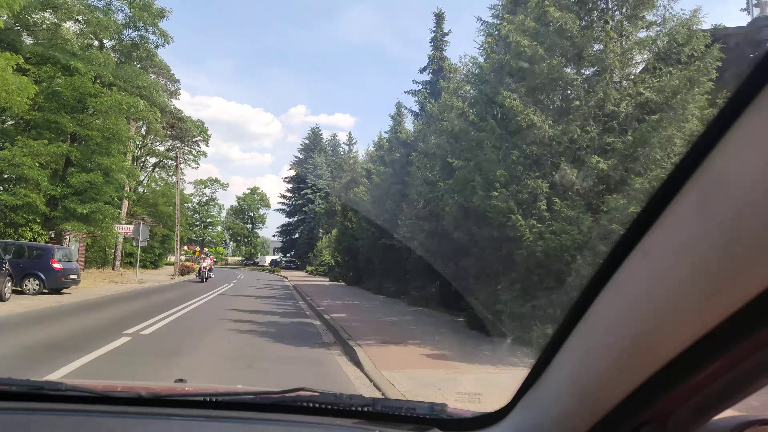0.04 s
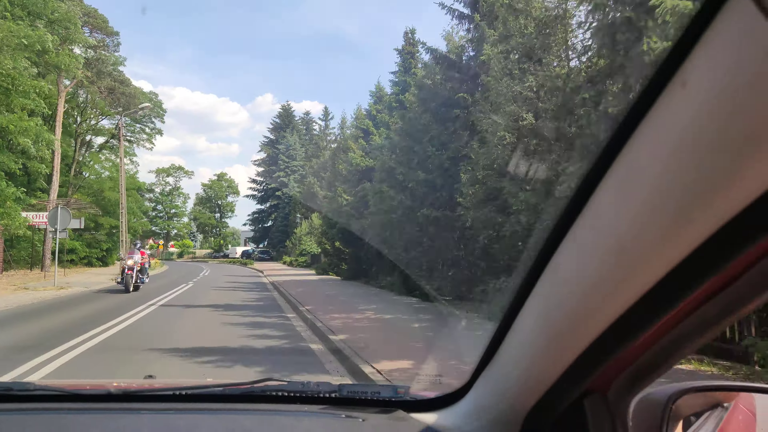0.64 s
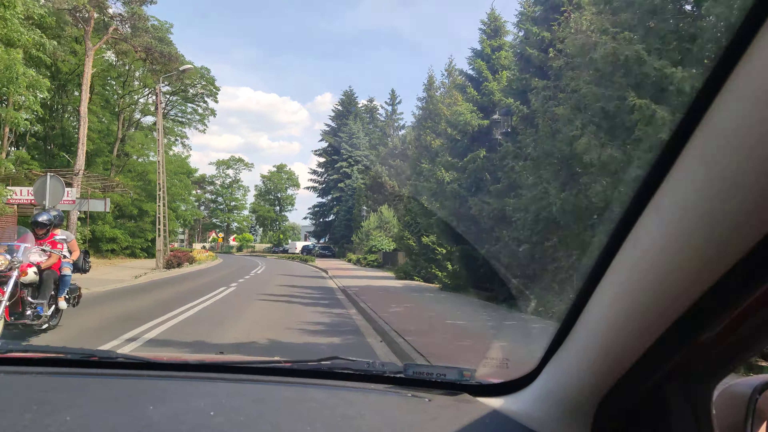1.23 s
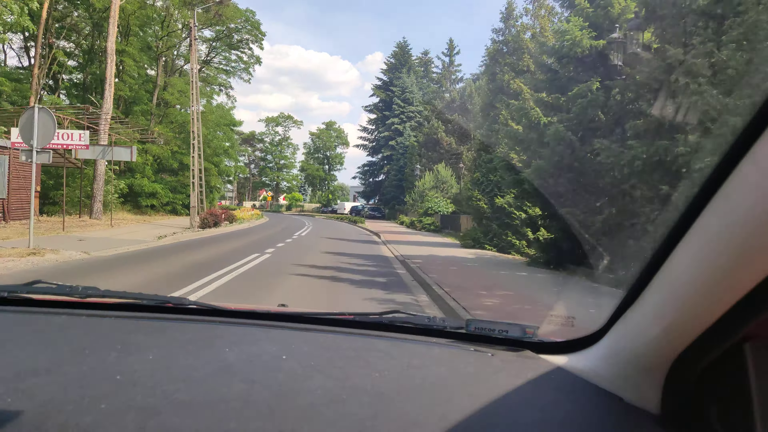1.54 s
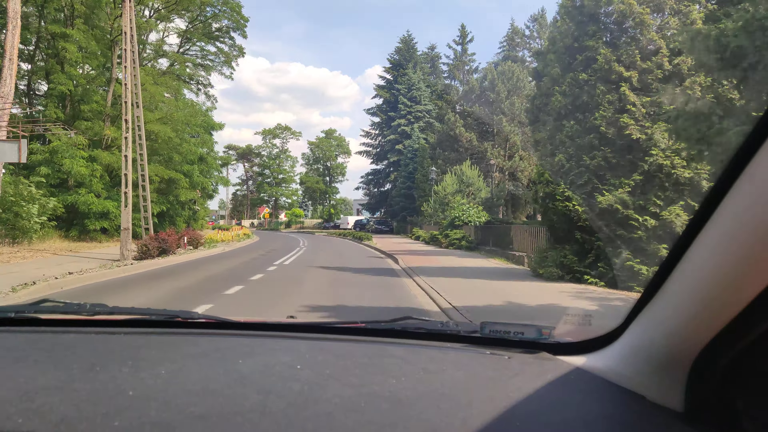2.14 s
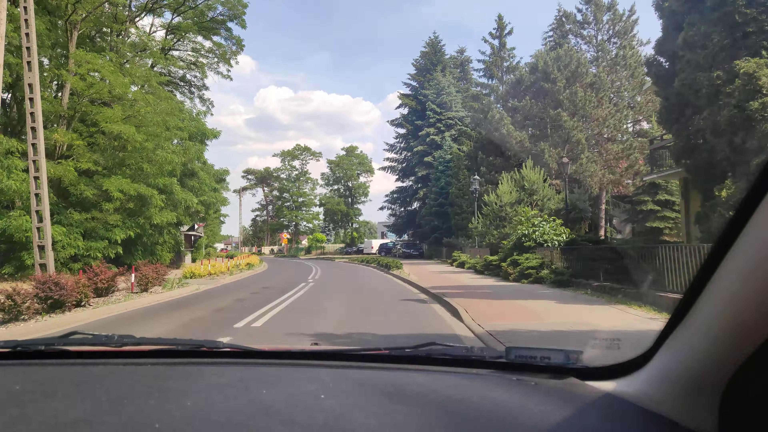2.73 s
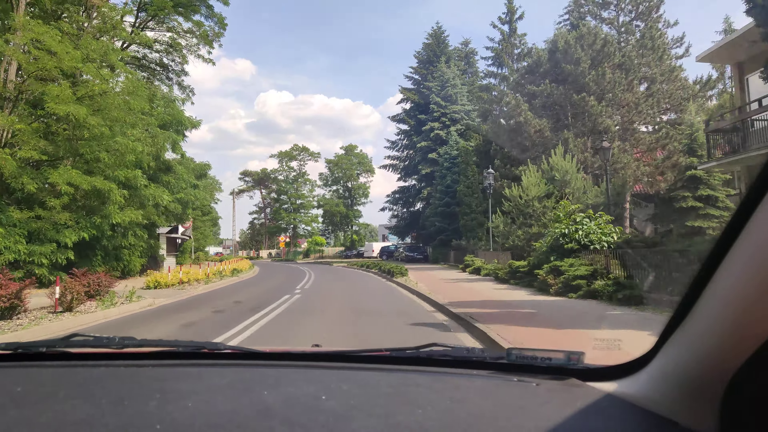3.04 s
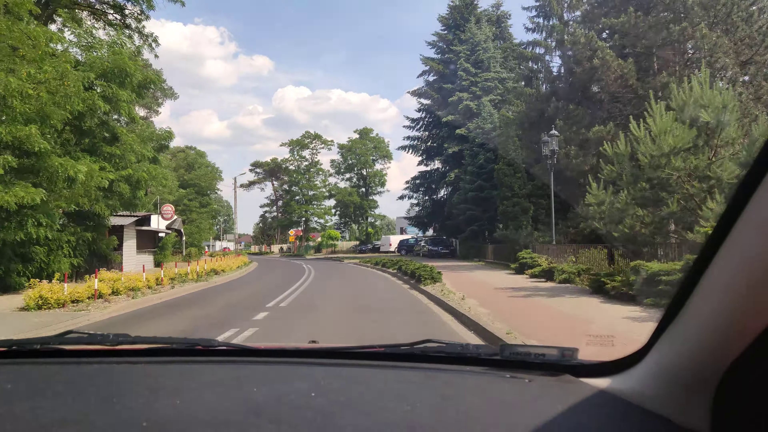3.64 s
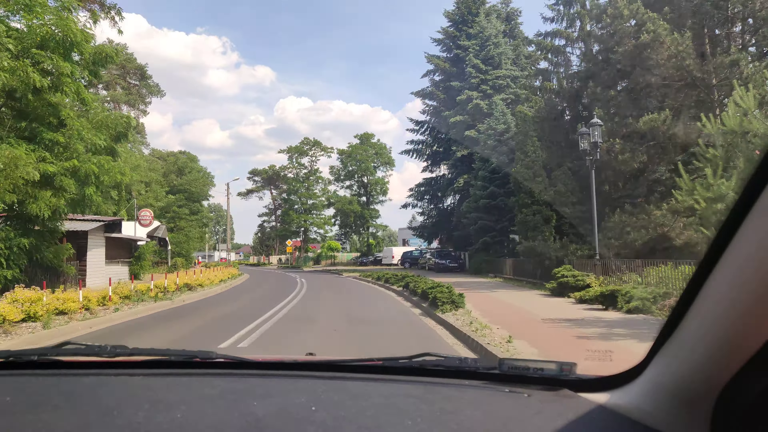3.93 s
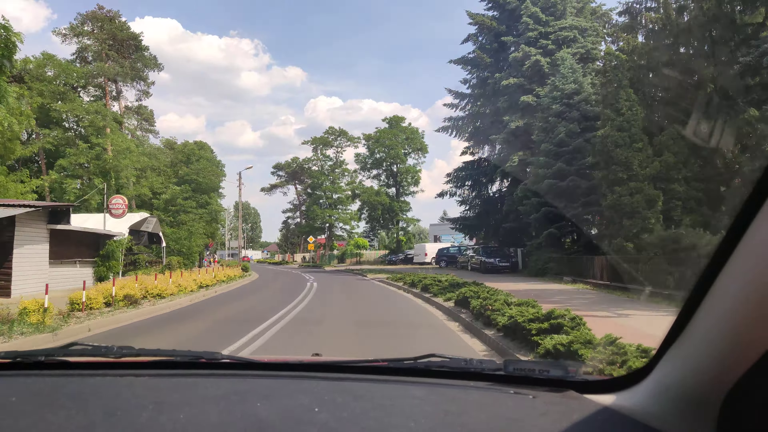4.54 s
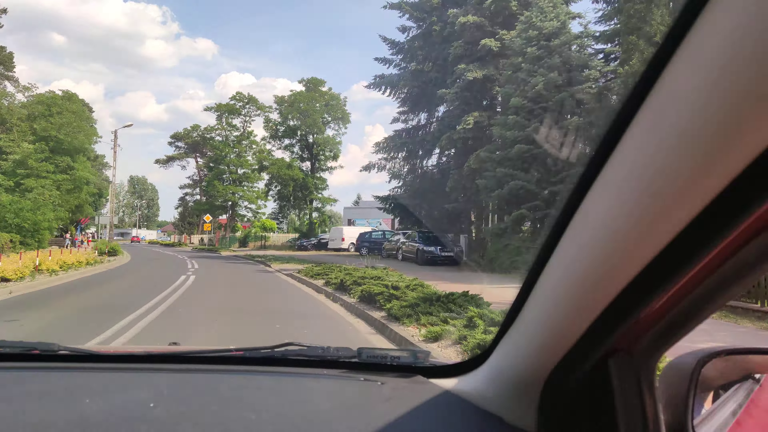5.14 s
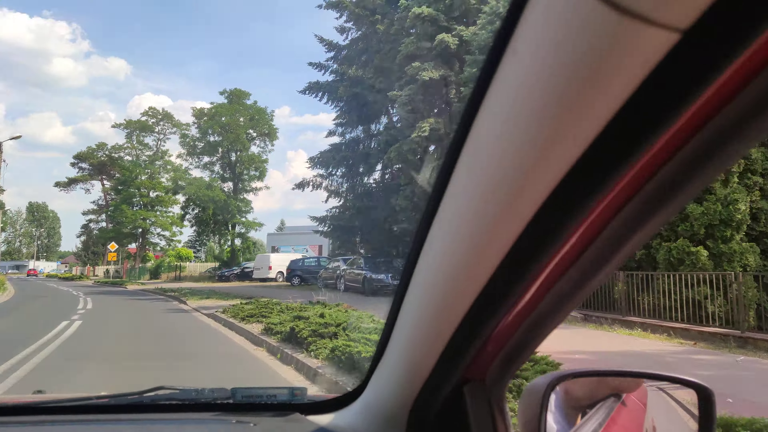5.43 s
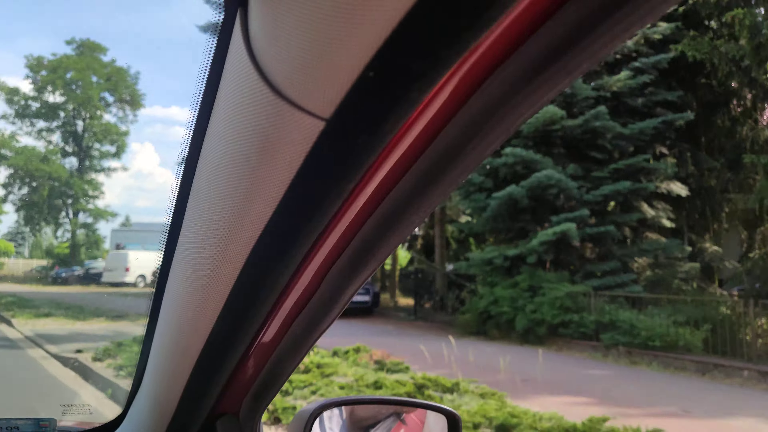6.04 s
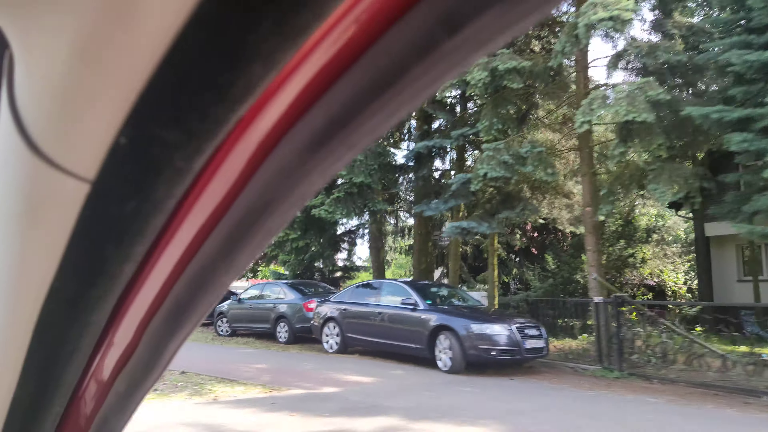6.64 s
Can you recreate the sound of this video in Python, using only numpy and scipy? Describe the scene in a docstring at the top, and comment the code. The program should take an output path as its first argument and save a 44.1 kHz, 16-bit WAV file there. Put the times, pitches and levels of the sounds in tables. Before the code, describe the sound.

Tyres and engine rumble steadily inside a moving car while air brushes an open window. An oncoming motorcycle swells up with an uneven, throbbing exhaust, passes close and falls away at a lower pitch. The cabin drone continues, with one faint squeak. Finally the rush of air returns, and wind strikes the left side of the microphone in loud, crackling thumps.

```python
"""A twin-cylinder motorcycle thuds by the other way, dropping in pitch, heard from inside a small car.
Its uneven firings ring the exhaust pipes and its running gear sizzles through the open side window.
Tyres and engine drone in the cabin, the body shakes on the village road and air rushes past,
with a few faint squeaks and ticks. Near the end the microphone turns to the window
and gusts overload its left port."""
import sys
import numpy as np
from scipy import signal
from scipy.fft import rfft, irfft, next_fast_len
from scipy.io import wavfile
from scipy.ndimage import uniform_filter1d, minimum_filter1d, map_coordinates

SR = 44100
rng = np.random.default_rng(int(sys.argv[2]) if len(sys.argv) > 2 else 0)


def store_wav(level_fs):
    """Save 16-bit WAV to argv[1]."""
    pcm = np.round(np.clip(np.atleast_2d(level_fs), -1, 1) * 32767)
    wavfile.write(sys.argv[1], SR, pcm.T.astype(np.int16))


N = 304290
TIME = np.arange(N) / SR
PASS_S, ABREAST_S = 1.722, 0.1738  # the motorcycle is closest; time it takes to cover the lane gap
GUST_EDGE = 3.3  # how squarely a gust sets in and stops

# gusts on the left port: (time [s], force [dB], half length [s], hollow tone [Hz], tone level [dB])
GUST_HITS = [(5.944, -20, .004, 130, -13), (5.961, -9.5, 0.0085, 297, -11), (5.98, -34, .01, 302, -27),
             (6.028, -7.5, 0.0043, 170, -7), (6.048, -24, 0.0049, 367, -14.5),
             (6.072, -24, 0.0035, 500, -21), (6.297, -5.5, 0.0053, 816, -12.5),
             (6.311, -12.5, 0.0092, 424, -17), (6.333, -26, 0.0086, 503, -27), (6.418, -11, .011, 447, -17),
             (6.432, -0.5, 0.0053, 870, -15), (6.447, -11.5, .007, 640, -17),
             (6.488, -17, 0.0047, 500, -21), (6.5, -5, 0.0048, 743, -14), (6.513, -2.5, .007, 487, -11.5),
             (6.529, -3.5, 0.0063, 302, -12), (6.545, -13, .009, 586, -16.5),
             (6.575, -10, 0.0078, 400, -24), (6.589, 3, 0.0042, 970, -21), (6.602, 1, .005, 310, -6.5),
             (6.613, -10, .008, 450, -22), (6.634, -17, 0.0051, 400, -16), (6.65, 0, 0.0077, 824, -8.5),
             (6.677, -11, 0.012, 900, -24), (6.7, -17, 0.012, 320, -26), (6.717, -12.5, .006, 420, -20),
             (6.73, -1.5, 0.0038, 564, -10.5), (6.745, -10, 0.0073, 824, -27), (6.766, -17, .003, 297, -14),
             (6.797, -23, 0.0049, 250, -18), (6.817, -12.5, .003, 342, -9), (6.835, -20, .003, 600, -21),
             (6.859, -12, 0.004, 466, -16), (6.875, -12, .003, 150, -6), (6.886, 1, .004, 690, -4),
             (6.896, -6, 0.0039, 300, -8)]
# bright colour of the running gear and the trim ticks: (frequency [Hz], level [dB])
SIZZLE = [(600, -7.5), (1500, 9), (2300, -0.5), (3400, 0.5), (4350, 6.5), (5400, -4), (6600, 2.5),
          (7900, -7.5), (14000, -8)]


def motorcycle(mach=0.06, cycle_hz=20.45, firing_s=1.795):
    """The engine's clock seems fast as it nears and slow as it leaves; one firing lands at firing_s."""
    extra_path_s = np.hypot(TIME - PASS_S, ABREAST_S) - np.hypot(PASS_S, ABREAST_S)
    clock = TIME - mach * extra_path_s
    doppler = lambda x: np.interp(clock, TIME, x)
    cycle = cycle_hz * (TIME - np.interp(firing_s, TIME, clock))
    return exhaust(cycle, doppler) + exhaust_drone(doppler(cycle)) + running_gear()


def exhaust(cycle, doppler, second_at=0.44, second_gain=0.56, puff_cycles=0.31, rasp=0.4):
    """Two uneven firings a cycle ring the pipes, each followed by a puff of turbulent gas."""
    # open pipe, sharp bark, churning gas and muffled thud: (frequency [Hz], level [dB])
    pipe_eq = [(40, -16), (110, -24.5), (190, 6.5), (275, 10), (365, -1.5), (440, 2), (570, -10),
               (700, -18.5), (900, -27), (1200, -47), (2000, -62), (4000, -84), (9000, -115)]
    bark_eq = [(200, -26), (500, -6.5), (720, -2), (900, -8.5), (1100, -21), (1600, -36), (5000, -73)]
    roar_eq = [(70, -30), (140, -0.5), (220, 3.5), (300, -5.5), (380, -11), (700, -42), (2000, -80)]
    thud_eq = [(30, -31), (70, -10.5), (130, 2), (200, 5.5), (245, 4), (310, -16), (600, -41), (1500, -76),
               (5000, -110)]
    # pipe and bark resonances: (frequency [Hz], width [Hz], lift [dB])
    pipe_modes = [(505.6, 43, 10.5)]
    bark_modes = [(686, 65, 7.5), (820, 41, 7)]
    fire = lambda offset: np.diff(np.floor(cycle - offset), prepend=np.floor(cycle[0] - offset))
    pulses = (fire(0) + second_gain * fire(second_at)) * amp(0.9 * wobble(40.5))
    puff = lambda offset: np.exp(-((cycle - offset) % 1) / puff_cycles)
    puffs = puff(0) + second_gain * puff(second_at)
    gas = lambda *tone: unit(ring(puffs * rng.standard_normal(N), *tone))
    firings = lambda *tone: doppler(unit(unit(ring(pulses, *tone)) + rasp * gas(*tone)))
    pipe = spread(firings(pipe_eq, pipe_modes), doppler(gas(pipe_eq, pipe_modes)))
    pipe *= amp(passing(-24.5, fade_db=22.5, rear_db=8, window_db=6, lead_s=0.013))
    # the bark beams backwards: the pipe mouths point at the window just after the pass
    bark = spread(firings(bark_eq, bark_modes), firings(bark_eq, bark_modes))
    bark *= amp(passing(-36, fade_db=26, rear_db=5, window_db=5, lead_s=-0.085))
    roar = spread(doppler(gas(roar_eq)), doppler(gas(roar_eq)))
    roar *= amp(passing(-24.5, fade_db=29, rear_db=-1.5, window_db=5.5))
    thud = firings(thud_eq) * amp(passing(-18.5, fade_db=21.5, rear_db=1.8, window_db=0.5))
    return pipe + bark + roar + thud


def exhaust_drone(cycle, orders=(5, 6, 9, 10, 11, 13)):
    """Harmonics of the motorcycle's engine cycle swell and fade in the cabin."""
    # thrum of the lowest order: (time [s], level [dB])
    thrum = [(0, -48), (1.2, -30), (1.52, -23.5), (1.65, -37), (1.86, -17), (2.12, -16.5), (2.36, -29.5),
             (2.86, -22.5), (3.0, -33), (3.3, -26.5), (3.8, -34), (6.9, -66)]
    # higher orders: (level [dB], loss per tenfold distance [dB], rear lift [dB], window lift [dB])
    upper_orders = [(-32, 9.7, -3.5, -1), (-30, 18.2, -6.5, 1.3), (-31, 14.6, 2.5, 0),
                    (-37, 14.4, -3.5, 1.3), (-37, 11.2, 5, 0)]
    levels_db = [*curves(thrum), *(passing(*row) for row in upper_orders)]
    tone = lambda k: np.sqrt(2) * np.sin(2 * np.pi * k * cycle + 0.25 * wobble(37))
    return sum(amp(db + 1.66 * wobble(19)) * tone(k) for k, db in zip(orders, levels_db))


def running_gear():
    """The front of the motorcycle hisses, so this layer passes a little early."""
    # resonances of the gear: (frequency [Hz], width [Hz], lift [dB])
    gear_modes = [(4000, 130, 4.5), (4620, 210, 3), (6500, 300, 2.5)]
    level_db = passing(-43, fade_db=18, rear_db=1.5, window_db=12, lead_s=0.0039)
    return amp(level_db + 1.1 * wobble(60.64)) * rush(SIZZLE, gear_modes)


def passing(level_db, fade_db, rear_db, window_db, lead_s=0):
    """Pass-by level in dB: fade_db lost per tenfold distance, lifts from behind and at the window."""
    window_half_s, frame_sharpness = 0.093, 4.4
    t = TIME - PASS_S + lead_s
    distance = np.hypot(t / ABREAST_S, 1)
    behind = t / ABREAST_S / distance
    in_window = np.exp(-np.abs(t / window_half_s) ** frame_sharpness)
    bend_db = 0.97 * t ** 2  # bends screen it off when far away
    return level_db - fade_db * np.log10(distance) + rear_db * behind + window_db * in_window - bend_db


def gust_force(wake_db=-27, wake_half_s=0.012, wake_lag_s=0.0055):
    """Each gust is a sharp-edged core inside a wider, weaker wake."""
    cores = swells([(s, db, half) for s, db, half, *_ in GUST_HITS], GUST_EDGE)
    wakes = swells([(s + wake_lag_s, db + wake_db, wake_half_s) for s, db, *_ in GUST_HITS])
    return np.hypot(cores, wakes)


def wind(force):
    """Eddies strike the left port; the stronger the gust, the finer its turbulence."""
    # slow airflow over the port: (time [s], level [dB])
    breeze = [(5.8, -23), (5.95, -14), (6.08, -22.5), (6.2, -18.5), (6.36, -26), (6.5, -21), (6.9, -19.5)]
    # thump of a gust: (frequency [Hz], level [dB])
    buffet_eq = [(20, 1), (70, 0.5), (150, 2), (250, -4.5), (380, -8.5), (650, -13), (1100, -23.5),
                 (2000, -43.5), (4000, -64), (9000, -68)]
    rumble = noise([(15, -28), (60, 0), (130, -7), (300, -25.5), (700, -42.5), (2000, -50), (5000, -94)])
    rumble *= amp(curves(breeze)[0])
    fine = noise([(150, -27), (650, 1.5), (1100, 0.5), (2000, -16), (4000, -28.5), (9000, -66)])
    crackle = amp(-11) * force ** 2 * even(fine, span_s=0.0035)
    thumps = amp(-1.3) * force ** 0.8 * even(noise(buffet_eq), span_s=0.0107)
    return np.array([rumble + thumps + flutter() + crackle, np.zeros(N)])


def flutter(waver=0.12):
    """Each gust sheds eddies at its own rate for a few cycles: a hollow knock."""
    unsteady_s = np.cumsum(1 + waver * wobble(400)) / SR
    knocks = np.zeros(N)
    for s, _, half, hz, db in GUST_HITS:
        phase = 2 * np.pi * hz * (unsteady_s - np.interp(s, TIME, unsteady_s))
        knocks += swells([(s, db, half)], GUST_EDGE) * np.sin(phase + rng.uniform(0, 2 * np.pi))
    return knocks


def choke(force, threshold_db=-33.5, depth_db=-10.5, hold_s=0.074, ramp_s=0.024):
    """Channel gains: the left port lets less through during a gust and just after it."""
    gain = np.maximum(1 / np.hypot(1, force / amp(threshold_db)), amp(depth_db))
    half = int(hold_s * SR / 2)
    held = minimum_filter1d(gain, 2 * half + 1, origin=half)
    return np.array([uniform_filter1d(held, int(ramp_s * SR) + 1), np.ones(N)])


def car(crank_hz=26.95):
    """The body shakes, the cabin air booms, and a four-cylinder engine fires twice a turn."""
    # body shake from road roughness and from single bumps: (time [s], level [dB])
    ride = [(0, -24), (1.2, -17.5), (1.7, -18.5), (3.4, -24.5), (6.4, -23.5), (6.9, -21)]
    bumps = [(.04, -13.5), (.41, -14.5), (.84, -15.5), (1.21, -16.5), (1.95, -20.5), (3.0, -19),
             (3.78, -21), (5.48, -22)]
    # body shake and cabin boom: (frequency [Hz], level [dB])
    shake_eq = [(8, -13), (18, 3.5), (28, 4.5), (40, -6), (58, -6), (75, -18.5), (120, -35), (250, -103)]
    boom_eq = [(55, -44), (80, -9), (97, -9), (112, -6), (131, 3), (155, -3), (180, -15.5), (230, -20),
               (400, -66)]
    # air modes of the cabin: (frequency [Hz], width [Hz], lift [dB])
    boom_modes = [(129.8, 4.9, 6), (145.7, 11, 3.5)]
    # balance as the microphone turns to the window: (time [s], left minus right [dB])
    balance = [(0, -2.5), (2.2, -.4), (4.3, -3.5), (5.3, -5), (5.8, -2), (6.9, 2.5)]
    crank = 2 * np.pi * np.cumsum(crank_hz * (1 + 0.0025 * wobble(2.24))) / SR
    engine = amp(-31) * np.sin(crank) + amp(-30) * np.sin(2 * crank)
    ride_db, = curves(ride)
    shake = np.hypot(amp(ride_db), swells([(s, db, 0.1) for s, db in bumps]))
    body = shake * spread(even(noise(shake_eq), span_s=0.092), noise(shake_eq))
    boom_db = -25 + 0.72 * (ride_db - ride_db.mean())  # a rougher road booms more
    cabin = amp(boom_db) * spread(even(noise(boom_eq, boom_modes), span_s=0.17), noise(boom_eq))
    return (engine + body + cabin) * pan(curves(balance)[0])


def tyres():
    """Tyres roar through the cabin and their hiss is thrown back from the roadside."""
    # tyre noise along the road: (time [s], roar [dB], hiss [dB])
    levels = [(0, -32.5, -69), (.7, -31.5, -50), (1.65, -29.5, -41.5), (2.9, -33, -51), (5.3, -33, -47.5),
              (6.3, -30.5, -48), (6.9, -30.5, -44.5)]
    # roar inside and hiss outside: (frequency [Hz], level [dB])
    roar_eq = [(120, -16.5), (200, -3.5), (310, 1), (375, -4), (470, -6), (630, -8), (950, -9.5),
               (1400, -14.5), (1800, -14.5), (2400, -19), (3300, -24), (5000, -33.5), (9000, -50)]
    hiss_eq = [(1200, 5.5), (2500, 5), (4300, 1.5), (5300, -1.5), (6500, -4.5), (8000, -11.5),
               (10000, -13.5), (14000, -14)]
    # cabin resonances: (frequency [Hz], width [Hz], lift [dB])
    cabin_modes = [(459.6, 23, 4.5), (608, 103, 6.5), (738, 35, 5.5), (1083, 40, 4), (1282, 40, 5.5),
                   (1400, 85, 8), (1880, 62, 3), (2210, 180, 2)]
    roar_db, hiss_db = curves(levels)
    roar = amp(roar_db + 0.6 * wobble(14)) * rush(roar_eq, cabin_modes)
    hiss = amp(hiss_db + 0.67 * wobble(24)) * rush(hiss_eq)
    return (roar + hiss) * pan(left_db=1.2)


def window_draught():
    """Air tears at the window edge on the left and rings the gap."""
    # tearing air: (frequency [Hz], level [dB])
    edge_eq = [(300, 6), (700, -7), (1300, 1), (2200, 2), (3000, -4.5), (4200, -13), (6000, -38),
               (7600, -41), (9500, -30), (12000, -40)]
    # gap resonances: (frequency [Hz], width [Hz], lift [dB])
    gap_modes = [(1770, 330, 1.5), (2320, 330, 1)]
    # swells of air: (time [s], level [dB], half length [s])
    draughts = [(.05, -32.5, 0.65), (.95, -33, 0.34), (2.2, -44.5, 0.33), (5.72, -35.5, 0.25),
                (5.89, -33, 0.053), (6.23, -31, 0.12), (6.6, -31, 0.22)]
    air = np.array([noise(edge_eq, gap_modes), amp(-31) * noise(edge_eq)])
    return air * swells(draughts) * amp(0.22 * wobble(22))


def squeak():
    """One faint chirp with a jittery pitch."""
    # its contour: (time [s], pitch [Hz], level [dB])
    contour = [(3.005, 4780, -85), (3.018, 4760, -53), (3.04, 4660, -55), (3.07, 4660, -53),
               (3.097, 4700, -48), (3.115, 4750, -55), (3.14, 4810, -54), (3.2, 4830, -66),
               (3.22, 4830, -90)]
    pitch_hz, level_db = curves(contour)
    sounding = (TIME > contour[0][0]) & (TIME < contour[-1][0])
    envelope = sounding * amp(level_db + 1.2 * wobble(130))
    return envelope * np.sin(2 * np.pi * np.cumsum(pitch_hz * (1 + 0.008 * wobble(300))) / SR)


def thin_whistle(centre_hz=11850, half_width_hz=200):
    """A narrow band of noise whistles very high, with a fine hiss around it."""
    # swells of the whistle and of its hiss: (time [s], level [dB], half length [s])
    whistle_swells = [(4.57, -63, .08), (5.0, -69, .11), (5.19, -59, 0.05), (5.4, -61, 0.08),
                      (5.65, -67, .06), (6.15, -69, .2)]
    sheen_swells = [(5.6, -62.5, .28), (6.23, -67, .08)]
    peak = lambda hz: 1 / (1 + ((hz - centre_hz) / half_width_hz) ** 2)
    narrow = unit(filtered(rng.standard_normal((2, N)), peak))
    whistle = swells(whistle_swells) * narrow * amp(1.5 * wobble(30))
    sheen = swells(sheen_swells) * rush([(7000, -25), (9400, 0), (11000, -2), (13000, -18)])
    return whistle + sheen


def ticks_and_swish():
    """The trim ticks on the right; a short swish sounds on the left."""
    # ticks and swish: (time [s], level [dB], half length [s])
    tick_hits = [(.615, -42, 0.00085), (6.703, -43.5, 0.0037)]
    swish_swell = [(1.335, -50, 0.025)]
    ticks = swells(tick_hits) * noise(SIZZLE)
    swish = swells(swish_swell) * noise([(2500, -12), (4500, 6), (7000, 1), (9000, -8), (14000, 0)])
    return ticks * pan(left_db=-11) + swish * pan(left_db=19)


def amp(db):
    """Decibels to gain."""
    return 10 ** (np.asarray(db) / 20)


def unit(x):
    """Scale to rms 1."""
    return x / np.sqrt(np.mean(x ** 2) + 1e-20)


def along(points, hz):
    """(Hz, value) points read on a log axis."""
    f, v = np.transpose(points)
    return np.interp(np.log(hz + 1), np.log(f + 1), v)


def curves(rows):
    """One value per sample for each column after the time."""
    s, *cols = np.transpose(rows)
    return [np.interp(TIME, s, c) for c in cols]


def swells(rows, edge=2):
    """Bell-shaped bursts whose powers add; a higher edge makes them squarer."""
    power = np.zeros(N)
    for s, db, half in rows:
        near = slice(*np.searchsorted(TIME, [s - 5 * half, s + 5 * half]))
        power[near] += amp(db) ** 2 * np.exp(-np.abs((TIME[near] - s) / half) ** edge)
    return np.sqrt(power)


def wobble(rate):
    """A smooth random curve, rate knots a second."""
    return map_coordinates(rng.standard_normal(int(N * rate / SR) + 4), [TIME * rate])


def filtered(x, response):
    """Shape x by a frequency response."""
    size = next_fast_len(N + SR // 2)
    return irfft(rfft(x, size) * response(np.fft.rfftfreq(size, 1 / SR)), size)[..., :N]


def colour(spectrum, modes, hz):
    """Gain of a smooth spectrum with narrow resonances on top."""
    lift_db = sum(db / (1 + (2 * (hz - centre) / width) ** 2) for centre, width, db in modes)
    return amp(along(spectrum, hz) + lift_db)


def ring(x, spectrum, modes=(), size=16384):
    """Minimum-phase colour: each pulse rings after it strikes."""
    cepstrum = irfft(np.log(colour(spectrum, modes, np.fft.rfftfreq(size, 1 / SR))))
    cepstrum[1:size // 2] *= 2
    cepstrum[size // 2:] = 0
    return signal.fftconvolve(x, irfft(np.exp(rfft(cepstrum))))[:N]


def noise(spectrum, modes=()):
    """Mono coloured noise of rms 1."""
    return unit(filtered(rng.standard_normal(N), lambda hz: colour(spectrum, modes, hz)))


def even(x, span_s):
    """Noise held at a steady level over each span."""
    return x / np.sqrt(np.abs(uniform_filter1d(x ** 2, int(span_s * SR) + 1)) + 0.05)


def spread(a, b, lag_s=0.00036):
    """Two sounds become the mid and side of a stereo field that reaches the left port first."""
    # likeness of left and right: (frequency [Hz], correlation [0-1])
    likeness = [(60, 1), (130, 1), (290, 1), (630, 0.99), (1000, 0.45), (1400, 0.5), (2100, 0.67),
                (3000, 0.085), (5000, 0.07), (9000, 0.017)]
    alike = lambda hz: np.clip(along(likeness, hz), -0.99, 0.99)
    mid = filtered(a, lambda hz: np.sqrt(1 + alike(hz)))
    side = filtered(b, lambda hz: np.sqrt(1 - alike(hz)))
    delay = lambda hz: np.exp(np.outer([1, -1], 1j * np.pi * hz * lag_s))
    return unit(filtered(np.array([mid + side, mid - side]), delay))


def rush(spectrum, modes=()):
    """Stereo noise of rms 1."""
    return spread(noise(spectrum, modes), noise(spectrum, modes))


def pan(left_db):
    """Channel gains for a steady or moving level difference."""
    return amp(np.outer([0.5, -0.5], left_db))


def scene():
    """The drive and the pass-by, ducked on the left under the gusts."""
    bed = car() + tyres() + window_draught() + motorcycle()
    details = squeak() + thin_whistle() + ticks_and_swish()
    force = gust_force()
    return (bed + details) * choke(force) + wind(force)


def record(dry):
    """The microphone saturates on the gusts and keeps nothing above its band limit."""
    ceiling, hardness, top_hz = 0.91, 6, 14330
    clipped = dry / (1 + np.abs(dry / ceiling) ** hardness) ** (1 / hardness)
    return filtered(clipped, lambda hz: hz < top_hz)


dry = scene()
out = record(dry)
store_wav(out)
```